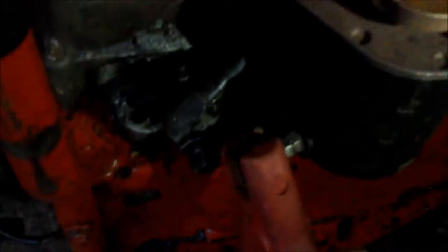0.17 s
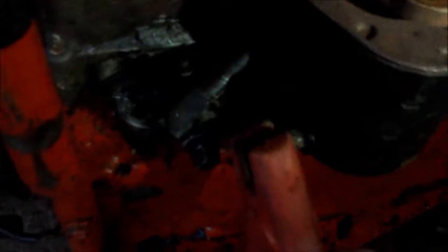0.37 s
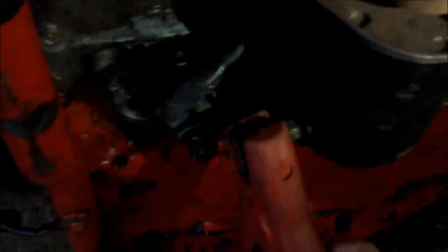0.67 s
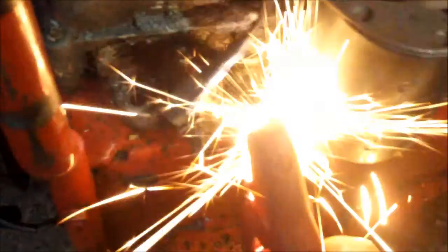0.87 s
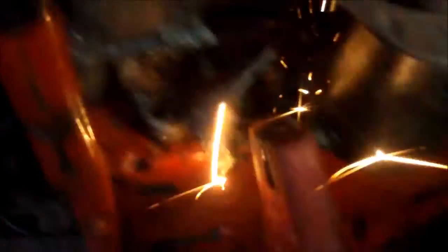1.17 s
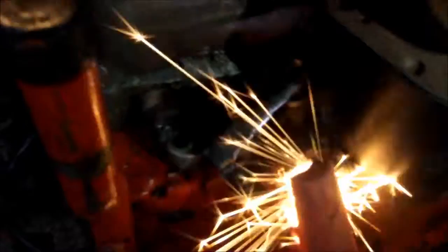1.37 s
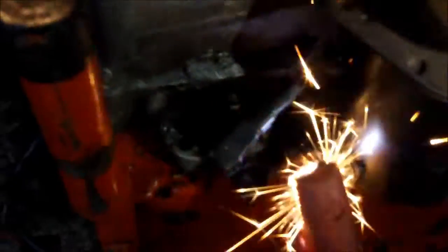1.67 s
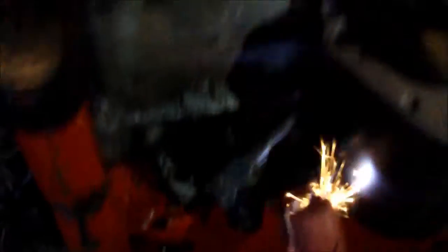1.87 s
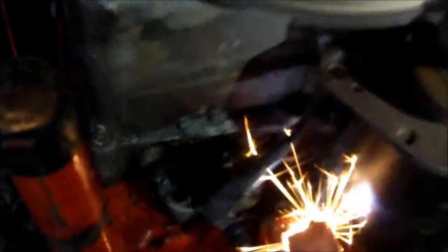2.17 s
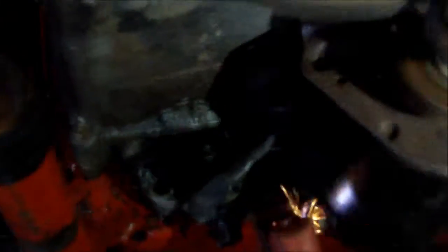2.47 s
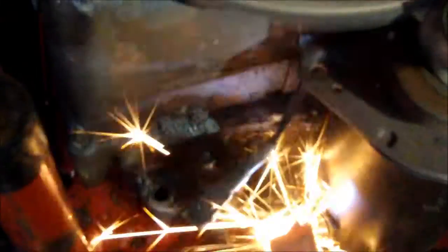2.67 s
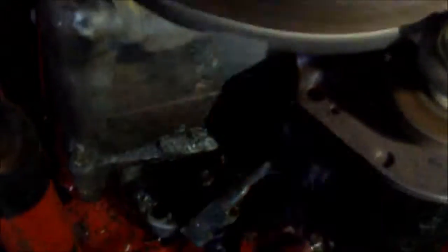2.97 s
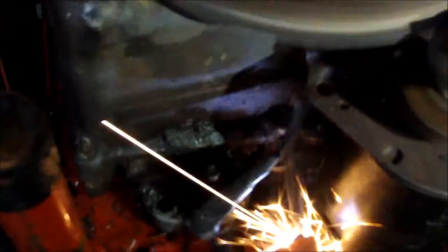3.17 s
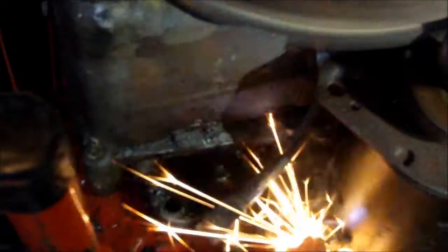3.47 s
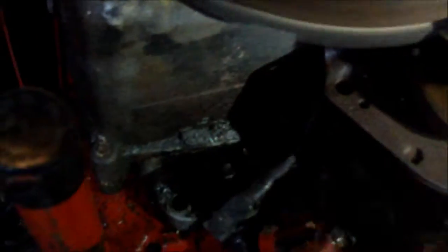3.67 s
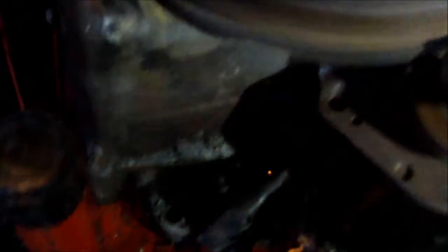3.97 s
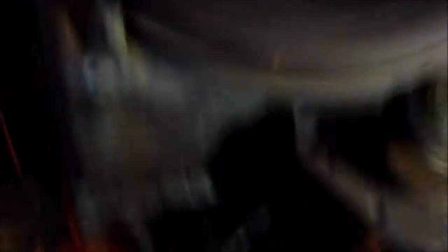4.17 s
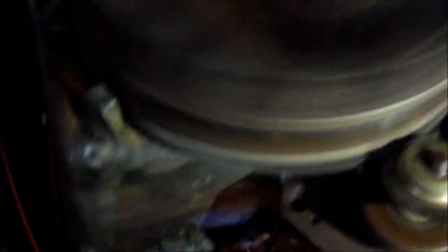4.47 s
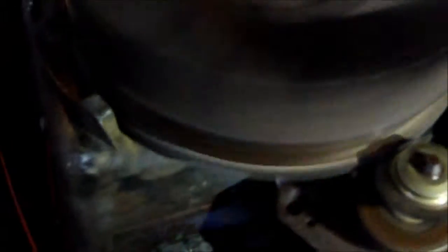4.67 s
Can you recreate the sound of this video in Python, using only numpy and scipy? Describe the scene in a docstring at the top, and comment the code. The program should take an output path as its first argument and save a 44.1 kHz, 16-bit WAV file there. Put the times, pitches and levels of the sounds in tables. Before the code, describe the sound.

A starter gear slams into a flywheel amid sparks, teeth clacking slowly, then blurring into a harsh surging metallic grind in a garage.

```python
"""Starter motor cranking a small engine

In a garage, close by, a pinion slams into the ring gear amid sparks. Teeth clack one by one where the piston
fights compression, then blur into a rising grind; before that the room hums faintly under a thin buzz.
Tooth blows ring random-phase metal modes at a varying tooth rate. The motor is filtered noise plus tooth pulses
through case resonances; slam is decaying sines, sparks are noise bursts, room is shaped noise and mains pulses."""
import sys
import numpy as np
from scipy import signal
from scipy.fft import rfft, irfft, next_fast_len
from scipy.io import wavfile
from scipy.ndimage import uniform_filter1d, map_coordinates

SR = 44100
rng = np.random.default_rng(int(sys.argv[2]) if len(sys.argv) > 2 else 0)


def wav_out(sig):
    """Save sig, one row per channel (or a flat mono array), as 16-bit PCM at SR to the path in sys.argv[1]."""
    wavfile.write(sys.argv[1], SR, np.round(np.clip(np.atleast_2d(sig).T, -1, 1) * 32767).astype(np.int16))


N = 213172

CRUISE_HZ = 250  # tooth rate at which rate-dependent levels are referenced
SINGLE_HZ = 135  # below this tooth rate the pushes make no tone


def amp(db):
    """Decibels to amplitude."""
    return 10 ** (np.asarray(db) / 20)


def unit(x):
    """Scale to rms 1."""
    return x / np.sqrt(np.mean(x ** 2) + 1e-20)


def along(points, hz):
    """Interpolate (hz, value) points on a log frequency axis."""
    point_hz, value = np.transpose(points)
    return np.interp(np.log(hz + 1), np.log(point_hz + 1), value)


def curves(rows, t_s):
    """Read each column after the time at the times t_s."""
    row_s, *cols = np.transpose(rows)
    return [np.interp(t_s, row_s, col) for col in cols]


def filtered(x, response):
    """Multiply the spectrum of x by a response of frequency."""
    size = next_fast_len(N + SR // 2)
    hz = np.fft.rfftfreq(size, 1 / SR)
    return irfft(rfft(x, size) * response(hz), size)[..., :N]


def hiss(spectrum):
    """Gaussian noise coloured by (hz, level_db) points, rms 1."""
    return unit(filtered(rng.standard_normal(N), lambda hz: amp(along(spectrum, hz))))


# individually timed blows, strong and weak: pinion bouncing into mesh, then single teeth that stand out:
# start_s, early_level_db, casting_over_ring_db
SINGLE_BLOWS = [(0.6373, -16, 14), (0.6474, -18, 19), (0.6502, -15.5, 28), (0.6555, -3, 10.5),
                (0.662, -15.5, 10), (0.676, -5.5, 2), (0.6825, -15, 4), (0.695, -5, -4), (0.704, -7.5, 3),
                (0.712, -10, 3), (0.7197, -7, -7), (0.7274, -9.5, -7), (0.7343, -11, -10), (0.741, -13, -9),
                (0.748, -11, -4), (0.7564, -12, 0), (0.773, -13.5, 0), (0.785, -14.5, -4), (0.826, -13, 6),
                (0.85, -11, 3), (0.871, -14, 0), (0.8904, -18, 17), (0.9387, -10.5, 7.5), (0.9581, -21, -2),
                (0.963, -25, 5), (0.9851, -9, 4.5), (1.0005, -21, 0), (1.5281, -11, -20),
                (1.5601, -13.5, -12), (1.5937, -14, -2), (1.6581, -16, 0), (1.6985, -8, -0.5),
                (1.9261, -8.5, -6), (2.0115, -16, -5), (2.1333, -13, 1), (2.4434, -12, 0),
                (2.7629, -8.5, -4), (2.7745, -16, 11), (2.867, -12.5, 1.5), (3.0758, -10.5, 2),
                (3.091, -11, 1), (3.1046, -10.5, -1), (3.1281, -20, 7)]
# slow rise and fall of tooth blows and motor noise: time_s, level_db
SLOW_LEVEL = [(1.0, 4.5), (1.07, -3.5), (1.3, 0.5), (1.5, -1.5), (1.87, 0), (2.0, 3), (2.2, -3), (2.43, 0),
              (2.6, -1), (2.93, 1), (3.02, 1), (3.09, 4), (3.17, 0), (3.27, 1), (3.5, -0.03), (4.25, 0.3),
              (4.5, 0), (4.83, -0.6)]
BLOW_DB, BLOW_DB_PER_OCTAVE = -19, 2.86  # running tooth at CRUISE_HZ, slope with tooth rate
LOADED_DB, LOADED_HZ = 10, 70  # extra force on slow teeth, rate below which it tells
PICKUP_DB = 1  # most added while the starter drags the flywheel up to speed


def teeth(start_s, rate_hz, turn_teeth, slack):
    """One blow per tooth; the pinion runs out of true, so near 235 teeth/s every third or fourth hits harder."""
    luck = rng.standard_normal((len(start_s), 3))
    start_s = start_s + (.02 + .12 * slack) * luck[:, 2] / rate_hz
    single_s, single_db, single_casting_db = np.transpose(SINGLE_BLOWS)
    # no running tooth within 2.5 ms of a single blow
    free = np.abs(start_s[:, None] - single_s).min(axis=1) > .0025

    near_235_hz = np.exp(-((rate_hz - 235) / 40) ** 2)
    uneven_db = near_235_hz * 4.5 * np.cos(2 * np.pi * turn_teeth / 3.5) + (1.2 + .8 * slack) * luck[:, 0]
    speed_db = BLOW_DB_PER_OCTAVE * np.log2(rate_hz / CRUISE_HZ)
    load_db = LOADED_DB / (1 + (rate_hz / LOADED_HZ) ** 4)
    pickup_db = PICKUP_DB * np.tanh(np.maximum(np.gradient(rate_hz) / 6, 0))
    blow_db = BLOW_DB + speed_db + load_db + pickup_db
    blow_db = blow_db + wheel(turn_teeth)[0] + curves(SLOW_LEVEL, start_s)[0] + uneven_db
    casting_db = (3 - 4.0 * slack) * luck[:, 1]

    running = np.array([start_s, blow_db, casting_db])[:, free]
    single = np.array([single_s, single_db, single_casting_db])
    return blows(*np.c_[single, running], minor_db=-9, snap_db=4.5, snap_t60_s=0.0024, drift_db=2)


# main modes of gear and housing: mode_hz, width_hz, level_db
METAL = [(3234, 76, -7.5), (3410, 135, -3), (4663, 123, -6.5), (6430, 900, 20), (6560, 480, 19.5),
         (7260, 270, -14.5), (7570, 27, -8), (8110, 990, -9.5), (9160, 41, -2), (10334, 136, 5)]
# level of the many minor modes: mode_hz, level_db
CLATTER = [(710, -47), (1200, -12.5), (2800, -10.5), (3300, -8), (4940, -2), (6480, 5), (8230, 8.5),
           (11500, -8), (15200, -18.5), (16200, -38)]
# decay of the minor modes: mode_hz, t60_s
CLATTER_T60 = [(1500, 0.031), (6000, 0.022), (11000, 0.028), (15000, 0.014)]
TREBLE_DB_PER_OCTAVE = 1.5  # faster teeth strike brighter


def blows(start_s, early_db, casting_db, minor_db, snap_db, snap_t60_s, drift_db):
    """Each blow rings all modes at new phases; a short snap leads the ring."""
    t = np.arange(SR // 20) / SR
    main_hz, width_hz, main_db = np.transpose(METAL)
    minor_hz = np.linspace(1200, 16000, 120) + 55 * rng.uniform(-1, 1, 120)
    hz = np.r_[main_hz, minor_hz]
    level_db = np.r_[main_db, along(CLATTER, minor_hz) + minor_db]
    t60_s = np.r_[np.log(1000) / (np.pi * width_hz), along(CLATTER_T60, minor_hz)]

    ring = amp(-60 * t / t60_s[:, None])
    snap = amp(snap_db + 7.8 * (hz[:, None] > 11000) - 60 * t / snap_t60_s)
    attack = (1 - np.exp(-t / .0004)) ** 2
    modes = (ring + snap) * attack * np.exp(2j * np.pi * hz[:, None] * t)

    # wheel angle favours different bands
    turn_teeth = np.interp(start_s * SR, np.arange(N), teeth_passed()[1])
    bell_db, flange_db, cover_db = wheel(turn_teeth)[1:]
    casting = np.clip((5500 - hz) / 1200, 0, 1)
    bell = np.abs(hz - 3320) < 250
    flange = np.abs(hz - 8150) < 850
    cover = np.clip(np.minimum(hz - 8950, 11500 - hz) / 500, 0, 1)
    parts_db = np.outer(bell_db, bell) + np.outer(flange_db, flange) + np.outer(cover_db, cover)
    octaves = np.log2(curves(TOOTH_RATE, start_s)[0] / CRUISE_HZ) * (start_s > TOOTH_RATE[0][0])
    parts_db = parts_db + np.outer(TREBLE_DB_PER_OCTAVE * octaves, hz > 11500)

    # favoured modes drift at random, so neighbouring blows sound alike in colour
    field = rng.standard_normal((150, 20))
    drift = map_coordinates(field, np.meshgrid(start_s * 28, hz / 900, indexing="ij"), order=1)
    strength = amp(level_db + np.outer(casting_db, casting) + parts_db + drift_db * drift)

    draw = rng.standard_normal((len(start_s), len(hz), 2))
    draw = draw[..., 0] + 1j * draw[..., 1]
    # smaller amplitude spread: main modes answer every blow
    draw[:, :len(METAL)] /= np.abs(draw[:, :len(METAL)]) ** .8
    rings = ((strength * draw) @ modes).real

    # early_db sets the rms of the first 1/600 s, before the high-pass
    early_rms = np.sqrt(np.mean(rings[:, :SR // 600] ** 2, axis=1))
    rings = rings * (amp(early_db) / early_rms)[:, None]
    at = np.round(start_s * SR).astype(int)[:, None] + np.arange(len(t))
    out = np.bincount(at.ravel(), rings.ravel(), N + SR)[:N]
    return signal.sosfilt(signal.butter(3, 600, "high", fs=SR, output="sos"), out)


# effect of one flywheel turn: angle_deg, blow_db, flywheel_bell_db, flange_db, thin_cover_db
WHEEL = [(0, 3.5, 0, -2, 4.5), (30.4, 0.5, 4.5, 2.5, 0.5), (61, -1.5, 4.5, -4, -3),
         (91, 0.5, 3, -6.5, -3.5), (124, -.5, 0.5, 0.5, -.5), (157, 2, 1, 5.5, -3.8),
         (181, 1.5, -2, -3.5, 0.5), (214, 2.5, -4.5, 4, -7), (262, 0, 2.5, -5, -2),
         (278, -1, -0.7, -1.3, -3), (303, -5.5, 10.5, -4.5, -3), (318, 1.5, 8.5, -3.7, -1.5)]
RING_TEETH = 95  # teeth round the flywheel


def wheel(turn_teeth):
    """Level columns at the angle reached after turn_teeth; 0 dB before the gears mesh."""
    angle_deg, *cols = np.transpose(WHEEL)
    turned_deg = 360 * turn_teeth / RING_TEETH
    return [np.interp(turned_deg, angle_deg, col, period=360) * (turn_teeth > 0) for col in cols]


# cranking speed, sagging at each compression: time_s, tooth_rate_hz
TOOTH_RATE = [(1.02, 103.7), (1.075, 52.2), (1.125, 34.3), (1.185, 67.2), (1.245, 63.8), (1.3, 103.6),
              (1.36, 123.2), (1.43, 233.1), (1.66, 245.0), (1.76, 222.8), (1.88, 234.4), (1.93, 214.5),
              (1.975, 141.5), (2.015, 98.2), (2.09, 230.5), (2.14, 103.7), (2.2, 60.5), (2.29, 38.4),
              (2.36, 74.5), (2.41, 106.7), (2.52, 224.1), (2.71, 234.2), (2.84, 292.3), (2.9, 385.2),
              (2.96, 385.3), (3.0, 239.7), (3.07, 199.8), (3.1, 106.3), (3.2, 106.5), (3.245, 114.4),
              (3.32, 238.0), (3.65, 443.0), (3.755, 219.0), (3.81, 290.0), (3.9, 165.0), (4.02, 309.0),
              (4.26, 441.0), (4.375, 220.0), (4.41, 291.0), (4.52, 141.0), (4.64, 282.0), (4.84, 405.0)]


def teeth_passed():
    """Tooth rate and its running integral, the count of teeth passed, per sample."""
    t = np.arange(N) / SR
    rate_hz = curves(TOOTH_RATE, t)[0] * (t >= TOOTH_RATE[0][0])
    return rate_hz, np.cumsum(rate_hz) / SR


def tooth_times():
    """Times at which a new tooth meets the pinion, with tooth rate, teeth passed and slack 0-1."""
    rate_hz, turn_teeth = teeth_passed()
    at = np.flatnonzero(np.diff(np.floor(turn_teeth)))
    # teeth rattle loosely at speed and while the flywheel slows down
    slowing = uniform_filter1d(np.clip(-np.gradient(rate_hz) * SR / 2000, 0, 1), SR // 25)
    slack = 0.69 * slowing[at] * (rate_hz[at] > SINGLE_HZ) + (rate_hz[at] - 150) / 300
    return at / SR, rate_hz[at], turn_teeth[at], np.clip(slack, 0, 1)


# starter case resonances: mode_hz, width_hz, level_db
CASE = [(404.4, 24, -6.5), (592, 33, 0.5), (1021, 42, -0.5), (1375, 45, 6), (1787, 20, 9), (2052, 100, 5.5)]
# direct push of one tooth: freq_hz, level_db
PUSH = [(120, -68), (220, -20), (420, -21), (1300, -7.5), (2500, -70)]


def push_response(hz):
    """Band-pass case resonances of alternating sign plus the direct push."""
    case = 0
    for k, (mode_hz, width_hz, db) in enumerate(CASE):
        damping = 1j * hz * width_hz
        case = case + (-1) ** k * amp(db) * damping / (mode_hz * mode_hz - hz * hz + damping)
    return case + amp(along(PUSH, hz))


# motor body noise, relative density: freq_hz, level_db_per_hz
DRONE = [(110, -53), (200, -9), (300, -7), (420, -0.5), (2070, 8.5), (3300, 2), (8000, 2.5), (12000, -35),
         (16000, -55)]
MOTOR_DB, MOTOR_DB_PER_OCTAVE = -34, 2  # at CRUISE_HZ, slope with tooth rate
INRUSH_S, INRUSH_DB, INRUSH_DB_PER_S = .64, -19, 78  # unloaded motor surges at first contact, then falls


def motor(start_s, rate_hz):
    """Brush and bearing noise; tooth pushes ring the case into a stack of tones that glides with the speed."""
    t = np.arange(N) / SR
    size = np.clip(rate_hz / 400, 0, 1) ** .8 * (rate_hz > SINGLE_HZ)
    size = size * amp(2.5 * rng.standard_normal(len(start_s)))
    late = .03 * rng.standard_normal(len(start_s))  # share of a tooth gap
    late = late + .06 * uniform_filter1d(rng.standard_normal(len(start_s)), 6)
    at = np.clip(np.round((start_s + late / rate_hz) * SR).astype(int), 0, N - 1)
    pushes = np.bincount(at, size, N)

    whine = amp(-6) * unit(filtered(pushes, push_response))
    noise = amp(-3) * hiss(DRONE)
    speed_db = MOTOR_DB_PER_OCTAVE * np.log2(curves(TOOTH_RATE, t)[0] / CRUISE_HZ)
    running = amp(MOTOR_DB + curves(SLOW_LEVEL, t)[0] + speed_db)
    surge = amp(INRUSH_DB - INRUSH_DB_PER_S * (t - INRUSH_S))
    return (t > INRUSH_S) * np.hypot(running, surge) * (noise + whine)


# solenoid and pinion hitting their stops: start_s, level_db
SLAM = [(.638, -22), (.655, -6.5)]
# modes rung by each hit: mode_hz, level_db, t60_s
SLAM_MODES = [(232, -25.5, 0.061), (595, -15, 0.045), (1360, -6.5, 0.046), (1953, 5.5, 0.018),
              (2560, 2, 0.017)]


def slam():
    """Short mid-pitched clanks as the drive engages: decaying sines at random phase."""
    out, t = np.zeros(N), np.arange(SR // 4) / SR
    attack = 1 - np.exp(-t / 0.00042)
    for start_s, db in SLAM:
        ring = 0
        for hz, level_db, t60_s in SLAM_MODES:
            ring = ring + amp(level_db - 60 * t / t60_s) * np.sin(2 * np.pi * (hz * t + rng.random()))
        out[round(start_s * SR):][:len(t)] += amp(db) * ring * attack
    return out


# crackle from the first cable contact: time_s, level_db
SPARKS = [(.64, -25), (.82, -28.5), (.91, -37), (1.0, -31), (1.12, -48)]


def sparks():
    """Tiny sharp noise cracks at random moments, a few much stronger than the rest."""
    draw = rng.random((70, 2))
    first_s, last_s = SPARKS[0][0], SPARKS[-1][0]
    at = ((first_s + (last_s - first_s) * draw[:, 0]) * SR).astype(int)
    extra_db = -4.5 * np.log(draw[:, 1] + 1e-3)
    spikes = np.bincount(at, amp(curves(SPARKS, at / SR)[0] + extra_db), N)
    t = np.arange(SR // 100) / SR
    noise = hiss([(1500, -22.0), (7000, 0), (13000, -10), (16000, -30)])[:len(t)]
    crack = amp(-60 * t / 0.0079) * noise
    return signal.fftconvolve(spikes, crack)[:N]


# wall reverberation: freq_hz, t60_s
GARAGE = [(300, 0.82), (3000, 0.096), (12000, 0.041)]


def garage(x):
    """Walls answer 250 samples late with a noise tail; each frequency dies at its own speed."""
    hz, t, z = signal.stft(rng.standard_normal(SR // 2), SR, nperseg=256)
    decay = amp(-60 * t / along(GARAGE, hz)[:, None])
    tail = signal.istft(z * decay, SR, nperseg=256)[1]
    return signal.fftconvolve(np.pad(x, (250, 0)), tail / np.linalg.norm(tail))[:N]


# room hum and noise, relative density: freq_hz, level_db_per_hz
ROOM_TONE = [(24, -43), (40, -10), (199, -5.5), (243, -6.5), (433, 0.5), (965, 3.5), (3000, -1),
             (3800, -6.5), (7000, -12), (8500, -11.5), (15000, -27), (16000, -60)]
# thin buzz, relative density: freq_hz, level_db_per_hz
BUZZ = [(7100, -20), (7450, -3), (7650, 1), (7860, 2), (8000, -14), (8500, -25)]
# small dry ticks nearby: start_s, level_db
TICKS = [(0.1867, -25.5), (0.3641, -27)]
ROOM_DB, MAINS_HZ = -52, 60


def room_tone():
    """Distant hum and a thin buzz pulsed by the mains, both sinking once the starter runs; two early ticks."""
    t = np.arange(N) / SR
    pulses = np.diff(np.floor(MAINS_HZ * t), prepend=0) * amp(1.5 * rng.standard_normal(N))
    buzz = unit(filtered(pulses, lambda hz: amp(along(BUZZ, hz)) * (np.abs(hz - 7800) < 700)))
    sink = amp(np.interp(t, [.7, 1.2], [0, -12]))
    out = amp(ROOM_DB) * (hiss(ROOM_TONE) + amp(-15.5) * buzz) * sink
    tick_t = t[:SR // 50]
    for start_s, db in TICKS:
        noise = hiss([(400, -28), (2000, 4), (16000, -14)])[:len(tick_t)]
        # -11.5 dB: headroom for noise peaks above rms
        out[round(start_s * SR):][:len(tick_t)] += amp(db - 11.5 - 60 * tick_t / 0.015) * noise
    return out


def scene():
    """Starter sources, their garage reverberation and the room tone, in mono."""
    start_s, rate_hz, turn_teeth, slack = tooth_times()
    near = teeth(start_s, rate_hz, turn_teeth, slack) + slam() + motor(start_s, rate_hz) + sparks()
    return (near + amp(-14.5) * garage(near) + room_tone())[None]


TOP_HZ, BASS_CUT_HZ = 16300, 110


def record(dry):
    """Loudest peaks flatten at full scale; deep bass is cut and nothing is kept above TOP_HZ."""
    held = dry / (1 + np.abs(dry) ** 12) ** (1 / 12)
    return filtered(held, lambda hz: (hz < TOP_HZ) * hz ** 2 / (hz ** 2 + BASS_CUT_HZ ** 2))


dry = scene()
out = record(dry)
wav_out(out)
```